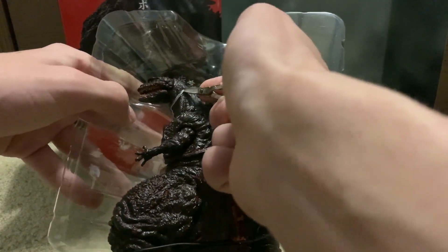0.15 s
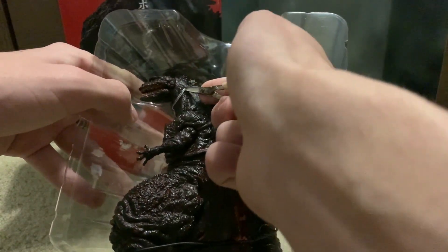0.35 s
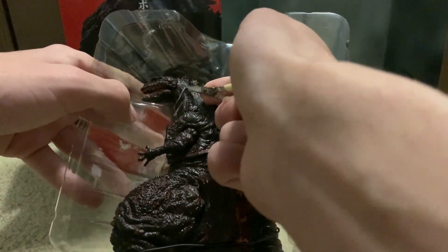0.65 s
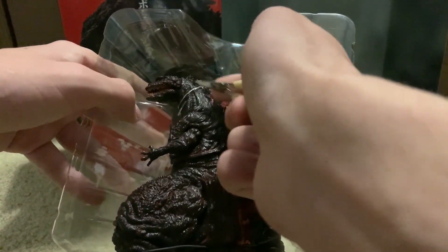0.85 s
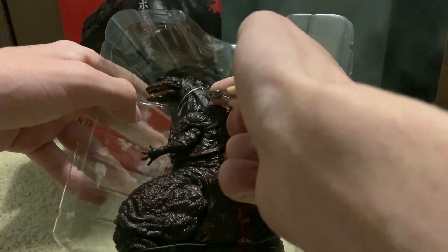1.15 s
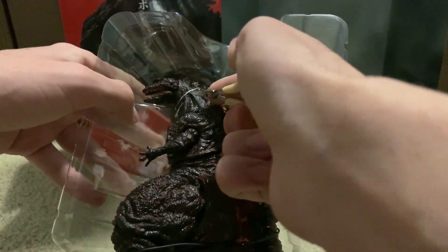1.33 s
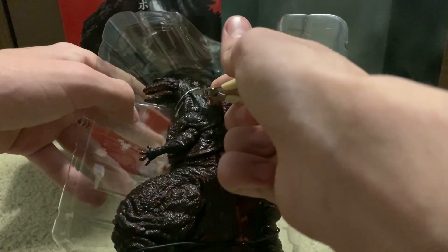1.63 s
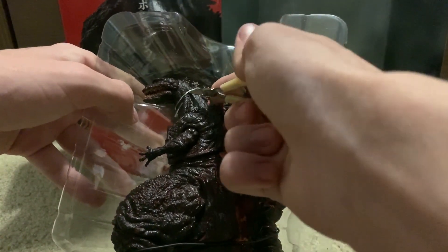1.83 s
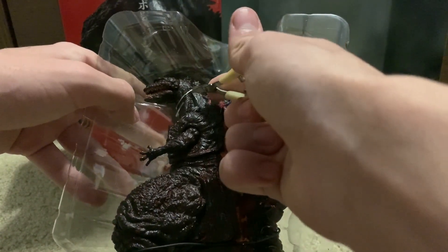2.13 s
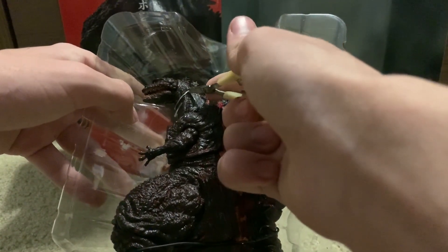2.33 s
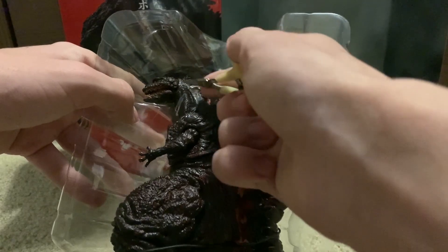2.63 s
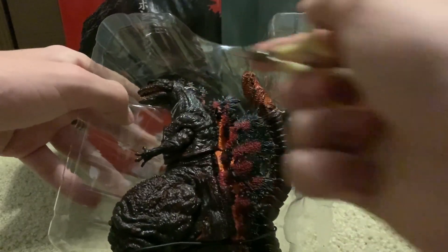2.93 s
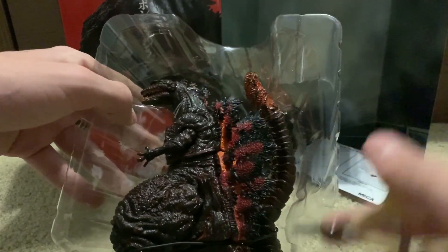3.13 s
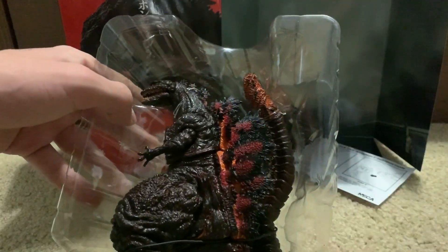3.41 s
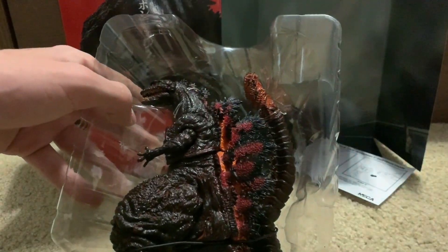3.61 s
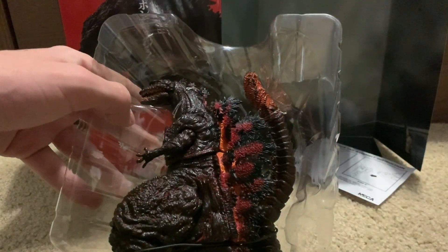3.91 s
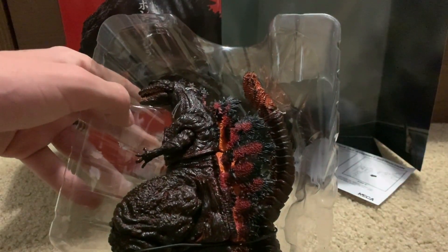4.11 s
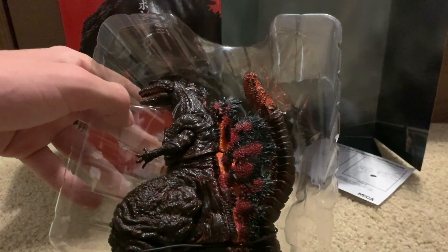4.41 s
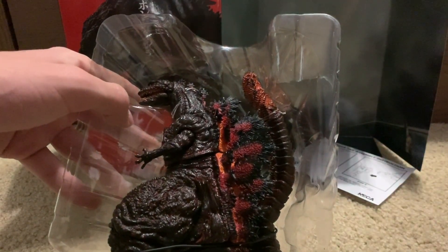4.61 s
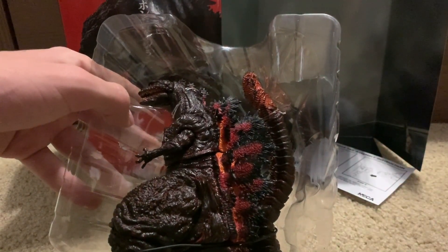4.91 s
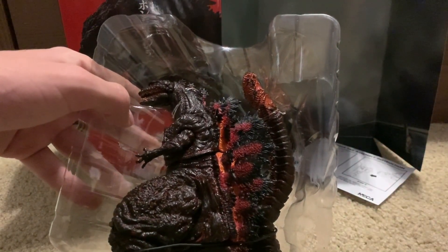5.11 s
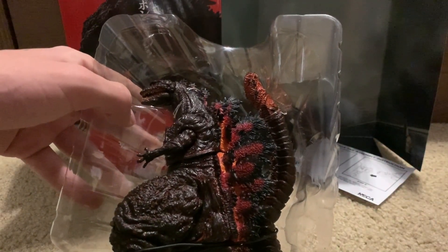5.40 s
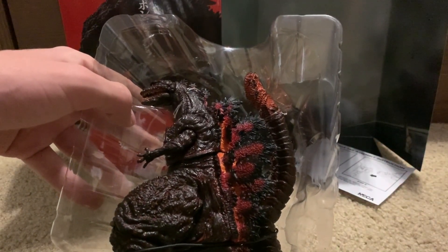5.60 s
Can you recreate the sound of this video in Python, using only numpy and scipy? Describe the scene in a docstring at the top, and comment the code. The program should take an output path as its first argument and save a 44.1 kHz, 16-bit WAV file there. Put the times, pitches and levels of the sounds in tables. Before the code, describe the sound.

Close to the microphone in a quiet room, small scissors snip the ties holding a toy figure in a thin plastic tray. Several short, sharp cracks come early, mixed with crisp plastic ticks, and the loudest snip falls near the middle. Soft knocks, rubs and rustles of handling follow, then one bright clink of the blades. Underneath, a faint low tone like a distant engine slowly rises, then sinks away.

```python
"""Close up, a hand shifts on a clear plastic tray holding a toy figure; the tray ticks and rustles over a
faint room hum. Small scissors snip its ties, each cut a short crack that rings the blades and jolts the
tray, with dull knocks, rubs and scrapes between. A low tone, perhaps a distant engine, slowly climbs.
After the last snip a hand swishes away; the tone fades and sinks, and the blades give one bright clink."""
import sys
import numpy as np
from scipy import signal
from scipy.fft import rfft, irfft, next_fast_len
from scipy.io import wavfile

SR = 44100
rng = np.random.default_rng(int(sys.argv[2]) if len(sys.argv) > 2 else 0)


def to_wav(s):
    """Save 16-bit WAV."""
    ch = np.atleast_2d(s).T  # columns
    pcm = np.round(np.clip(ch, -1, 1) * 32767)  # PCM
    wavfile.write(sys.argv[1], SR, pcm.astype(np.int16))


N = 253692

# the bands that shape every contact: (low edge [Hz], high edge [Hz])
BANDS = [(90, 350), (350, 900), (900, 2300), (2300, 5800), (7400, 11200), (10500, 16000)]
BAND_FILTERS = [signal.butter(N=3, Wn=band, btype="band", fs=SR, output="sos") for band in BANDS]
BAND_OCTAVES = np.log2(np.sqrt(np.prod(BANDS, 1)) / 1000)  # band centres, in octaves above 1 kHz
# modes of the thin tray with the figure in it, and of the steel blades: (pitch [Hz], level [dB], t60 [s])
TRAY_MODES = [(140, -13.5, 0.0077), (203, -14, 1), (271, -10.5, 0.099), (450.4, -9.5, 0.0037),
              (517, -5.5, 0.028), (664, 1.5, 0.027), (863, -6.5, .018), (1088, -7, 0.028),
              (1240, -6.5, 0.019), (1422, -1.5, 0.024), (2010, -6.5, 0.023), (2208, -6.5, 0.014),
              (2560, 0, .012), (3360, -6.5, 0.034), (3980, -2, 0.0051)]
BLADE_MODES = [(2330, -18.5, 0.12), (4640, -16.5, 0.11), (4230, -20, 0.18), (5170, -15, 0.018),
               (7800, -10, 0.012), (7780, -1.5, 0.0085), (11160, -4.5, 0.013), (13600, -5.5, 0.004),
               (12900, -3, 0.0082)]
# early echoes off the box, the arm and the floor: (delay [s], gain [factor])
ECHOES = [(.0023, -0.11), (.0042, 0.057), (.0069, 0.071), (0.0099, -.07), (0.0165, 0.046)]
# room tail, a row per band: (t60 [s], level against the direct sound [dB])
ROOM_TAIL = [(0.26, -1), (0.12, -9), (0.32, -16), (0.34, -13.5), (0.59, -23.5), (0.34, -21)]
# stereo width of that tail, per band: (side against mid [dB])
TAIL_WIDTH_DB = (-18.5, -14, -5, -14, -8, -8.5)
# appliance hum: (pitch [Hz], rms level [dB])
HUM = [(57, -74), (120, -75.5), (364, -91.5), (479, -82.5), (1800, -97.5), (13850, -95)]
# EQ of room air, handling, swish and microphone self-noise: (frequency [Hz], relative level [dB])
AIR_EQ = [(20, -22), (40, -7), (56, -2.5), (80, -5.5), (125, 0.5), (190, -5.5), (270, -18), (400, -23.5),
          (700, -45), (1500, -41), (6000, -55.5), (9000, -36), (14000, -42.5), (16000, -42.5)]
HANDLING_EQ = [(100, -21.5), (200, -0.5), (330, 2.5), (480, -1), (700, -16.5), (1300, -17), (2200, -21.5),
               (5000, -39), (12000, -49.5)]
SWISH_EQ = [(600, -31), (1500, -13), (2500, -2.5), (3800, -6), (5400, 1), (7000, -11), (15000, -17)]
SELF_NOISE_EQ = [(20, -14), (55, -3.5), (150, -1.5), (400, -11), (1500, -26.5), (5000, -28), (8000, -34.5),
                 (10000, -41.5), (14000, -36)]
# the strained tray and ties tick: (time [s], level [dB], extra treble [dB], pitch [Hz])
TICKS = [(-.03, -30.5, 8.5, 2420), (0.1173, -62, -25, 1500), (0.314, -48, -7, 1140),
         (0.4985, -46.5, 5.5, 2250), (0.5339, -50, 6, 725), (.5592, -45.5, -14, 1350),
         (0.6277, -40.5, -3.5, 2300), (.635, -54, 3, 2220), (0.6541, -50.5, 4, 1570),
         (0.6648, -48, -1, 1280), (0.6864, -34, 5.5, 2360), (0.747, -57.5, 11, 800.6),
         (1.0016, -66.5, -14, 1630), (1.6984, -50.5, -8.5, 1540), (1.7407, -66, 9, 4400),
         (1.8466, -63, -4, 2290), (1.941, -66.5, -9.5, 1310), (1.954, -56.5, -21, 1135),
         (2.044, -60, 6, 652), (2.627, -46, 8, 1730), (2.7695, -58.5, 0.5, 1200), (3.761, -75, -4.5, 1900),
         (3.942, -54, -5.5, 1510), (4.5332, -73.5, 5.5, 3250), (4.7544, -55.5, 0, 1220)]
# the holding hand tightens on the tray, then lets go: (time at the tightest [s], level [dB])
GRIPS = [(0, -62), (0.701, -58), (2.0, -61), (2.75, -56), (4.0, -69), (4.8, -70), (5.421, -64)]
# the blades bite a tie: (time [s], level [dB], brightness [dB/octave], crack decay [s], pitch [Hz])
SNIPS = [(0.29, -33.5, -2, 0.005, 698.5), (0.4361, -46.5, 2.54, .0014, 3100), (.45, -26, 2.32, .0012, 1545),
         (.4535, -34, 3.5, .0008, 11800), (.762, -23, -0.5, .0012, 620), (2.0559, -34, -0.8, 0.0014, 2044),
         (2.608, -20, -0.26, 0.0011, 544)]
# figure and fingers knock against the tray: (time [s], level [dB], brightness [dB/octave])
KNOCKS = [(0.602, -45.5, 0), (0.8578, -54, 0), (1.1401, -59.5, -1), (1.2066, -68, -3), (1.4137, -66, 1.5),
          (1.461, -62, 2), (1.5425, -57, -2), (2.1056, -48, 0.5), (2.5298, -52, 0), (2.556, -57, 3.5),
          (2.5631, -52.5, 0.5), (2.7084, -54.5, -3), (2.8517, -46, 2), (2.885, -50, 2.5),
          (2.9004, -47, -0.5), (3.8, -61.5, -2.5), (4.131, -56.5, 0), (4.774, -57, -1), (4.8042, -77, -7.5),
          (5.204, -62.5, 3)]
# soft rubs and scrapes, from fingers on the plastic and blades straining a tie before a snip:
# (peak time [s], half length [s], level [dB], centre [Hz])
RUBS_AND_SCRAPES = [(1.083, 0.047, -74.5, 1150), (1.99, 0.015, -66.5, 401.4), (2.048, 0.0032, -61.5, 1507),
                    (2.559, .022, -63, 898), (2.901, 0.014, -62.5, 914), (2.916, 0.013, -50, 262.6),
                    (3.803, .012, -54, 402), (4.17, 0.055, -71.5, 379.5), (4.758, 0.012, -62, 927),
                    (4.793, 0.019, -52, 296.5), (4.966, 0.11, -72.5, 398), (5.22, 0.044, -60.5, 415),
                    (5.212, .022, -74.5, 1207), (5.31, .014, -78, 1095), (5.449, 0.016, -75, 850),
                    (5.539, 0.012, -70.5, 860), (5.518, .07, -64, 308)]
# steel touches steel as the scissors open and shut: (time [s], level [dB])
CLINKS = [(1.6964, -59.5), (1.7409, -67.5), (4.127, -59), (4.4545, -72.5), (4.709, -53), (4.7144, -29.5),
          (5.0889, -57.5)]
# colour of each kind of contact, per band from low to high: (level [dB])
TICK_DB = (-5, -2, -2, -6.5, -20, -23.5)
SNIP_DB = (-11.5, -0.5, -0.5, -2, -3.5, -6)
KNOCK_DB = (2, 0, -12, -21.5, -35, -34)
CLINK_DB = (-25, -39, -36, -18, -3.5, 0.5)
# phase between the two microphone ports: (frequency [Hz], left's lead [rad])
PORT_PHASE = [(20, 0), (300, -.15), (700, -.25), (1500, -.55), (1900, -1.4), (3000, -2.1), (4500, -2.0),
              (5500, -4.2), (6400, -6.1), (8000, -4.4), (9600, -3.14), (11000, -2.0), (12300, -.3),
              (14000, .3), (15800, 2.5)]
# balance between them: (frequency [Hz], left minus right [dB])
PORT_BALANCE = [(20, .4), (150, .4), (300, -1.2), (700, -1.2), (1400, .7), (2300, .3), (4800, 3.3),
                (7000, 0), (15000, 0)]


def gain_of(db):
    """Decibels to a factor."""
    return 10 ** (np.asarray(db) / 20)


def unit_rms(x):
    """Scales to rms 1."""
    return x / np.sqrt(np.mean(x ** 2) + 1e-20)


def curve_at(points, hz):
    """Reads a (frequency [Hz], value) curve on a log-frequency axis."""
    f, value = np.transpose(points)
    return np.interp(np.log(hz + 1), np.log(f + 1), value)


def coloured(x, eq):
    """Puts x through an EQ curve, at rms 1."""
    return unit_rms(irfft(rfft(x) * gain_of(curve_at(eq, np.fft.rfftfreq(N, 1 / SR))), N))


def drift(rate_hz):
    """Slow random wander of rms 1."""
    hz = np.fft.rfftfreq(N, 1 / SR)
    hz = hz[hz < 150]
    real, imaginary = rng.standard_normal((2, len(hz)))
    return unit_rms(irfft((real + 1j * imaginary) * np.exp(-(hz / rate_hz) ** 2), N))


def swell(peak_s, rise_db_per_s, fall_db_per_s):
    """A fader move that climbs to 0 dB and falls away."""
    t = np.arange(N) / SR - peak_s
    return np.minimum(rise_db_per_s * t, -fall_db_per_s * t)


def add(mix, time_s, sound):
    """Mixes a sound in at a time."""
    part = mix[max(round(time_s * SR), 0):][:len(sound)]
    part += sound[:len(part)]


def in_bands(x):
    """Splits a sound into the BANDS, each with the energy of 10 ms at rms 1."""
    parts = np.array([signal.sosfilt(sos, x) for sos in BAND_FILTERS])
    return parts / np.sqrt((parts ** 2).sum(1, keepdims=True) / (SR // 100))


def focus(hz, depth_db):
    """A bell EQ across the bands, in dB: up around the struck part's pitch, down elsewhere."""
    nearness = np.exp(-(BAND_OCTAVES - np.log2(hz / 1000)) ** 2)
    return depth_db * (nearness - .5)


def ring(modes, t, detune):
    """Damped modes struck at t = 0; each blow lands elsewhere and shifts them a little."""
    hz, db, t60 = np.transpose(modes)[:, :, None]
    after = np.maximum(t, 0)
    fade = gain_of(db) * np.exp(-np.log(1000) * after / t60)
    return (fade * np.sin(2 * np.pi * hz * (1 + detune[:len(modes), None]) * after)).sum(0)


def click(levels_db, crack_s, part_hz, tray_db, blades_db, part_db, part_t60, rattle_db):
    """A gritty crack, as of tiny fractures; blades and struck part ring at once, the tray just after."""
    rattle_s, jolt_s = 0.006, 0.00058
    t = np.arange(SR // 10) / SR
    grit, detune = rng.standard_normal((2, len(t)))
    crack = grit * (np.exp(-t / crack_s) + gain_of(rattle_db) * np.exp(-t / rattle_s))
    # steel holds its pitch better than the flexing tray
    blades = gain_of(blades_db) * ring(BLADE_MODES, t, 0.013 * detune[::-1])
    tray = gain_of(tray_db) * ring(TRAY_MODES, t - jolt_s, 0.046 * detune)
    part = gain_of(part_db - 60 * t / part_t60) * np.sin(2 * np.pi * part_hz * t)
    return gain_of(levels_db) @ in_bands(crack + blades + tray + part)


def tick(db, crisp_db, hz):
    """A patch of thin plastic flips and rings briefly: crisp when bare, dull under a finger."""
    treble = BAND_OCTAVES > 1
    levels_db = np.array(TICK_DB) + db + crisp_db * treble + focus(hz, depth_db=4.5)
    return levels_db, click(levels_db, crack_s=0.0006, part_hz=hz, tray_db=-15, blades_db=-22,
                            part_db=-3, part_t60=0.0083, rattle_db=-23)


def room_tail(levels_db, build_s=0.00088, gate_s=0.11):
    """A diffuse room wash follows each click, as mid and side; a gate-like fade cuts it short."""
    t = np.arange(SR // 5) / SR
    t60, wet_db = np.transpose(ROOM_TAIL)[:, :, None]
    fade = np.exp(-np.log(1000) * t / t60 - (t / gate_s) ** 2) * (1 - np.exp(-t / build_s))
    fade *= gain_of(wet_db) / np.sqrt((fade ** 2).mean(1, keepdims=True))
    wash = in_bands(rng.standard_normal(len(t)))
    mid = gain_of(levels_db) @ (fade * wash)
    side = gain_of(levels_db + np.array(TAIL_WIDTH_DB)) @ (fade * wash[:, ::-1])
    return mid, side


def room_tone(air_db=-65, waver_db=2.5, wander_rad=0.39):
    """The bed: low rumble and faint hiss of still air, with a wavering appliance hum."""
    t = np.arange(N) / SR
    bed = gain_of(air_db) * coloured(rng.standard_normal(N), AIR_EQ)
    for hz, db in HUM:
        level = gain_of(db + waver_db * drift(11))
        bed += level * unit_rms(np.sin(2 * np.pi * hz * t + wander_rad * drift(12)))
    return bed


def friction(length, slips_per_s, hiss_db):
    """Stick and slip on plastic: tiny random pushes over a soft hiss."""
    slips = rng.standard_normal(length) * (rng.random(length) < slips_per_s / SR)
    return unit_rms(slips) + gain_of(hiss_db) * rng.standard_normal(length)


def handling(trim_db=1, resting_db=-92, clump_db=4.5):
    """Clumps of friction from the holding hand rustle the tray; the strongest grip rides the level."""
    drive = friction(N, slips_per_s=260, hiss_db=-14) * gain_of(clump_db * drift(30))
    tray = ring(TRAY_MODES, np.arange(SR // 12) / SR, np.zeros(len(TRAY_MODES)))
    body = signal.fftconvolve(drive, tray)[:N]
    rustle = coloured(unit_rms(body) + 2.9 * unit_rms(drive), HANDLING_EQ)
    grips_db = [db + swell(time_s, rise_db_per_s=62.5, fall_db_per_s=123.5) for time_s, db in GRIPS]
    return rustle * gain_of(trim_db + np.maximum(resting_db, np.max(grips_db, 0)))


def engine(nearest_db=-54, far_db=-74, waver_db=2.7, octave_db=-26, fade_in_s=0.25):
    """A far engine through the walls: it speeds up, then drops to idle, swelling as it passes."""
    start_hz, climb_octaves_per_s = 97.6, 0.2
    ease_off_s, sag_hz_per_s, idle_hz = 3.92, 39, 121.6
    t = np.arange(N) / SR
    climb_hz = start_hz * 2 ** (climb_octaves_per_s * np.minimum(t, ease_off_s))
    sag_hz = sag_hz_per_s * np.maximum(t - ease_off_s, 0)
    hz = np.maximum(climb_hz - sag_hz, np.minimum(climb_hz, idle_hz))
    phase = 2 * np.pi * np.cumsum(hz) / SR
    tone = unit_rms(np.sin(phase) + gain_of(octave_db) * np.sin(2 * phase))
    pass_db = np.maximum(nearest_db + swell(peak_s=3.24, rise_db_per_s=4.5, fall_db_per_s=12), far_db)
    fade_in = np.minimum(t / fade_in_s, 1) ** 2
    return fade_in * gain_of(pass_db + waver_db * drift(7.5)) * tone


def snip(db, brightness, crack_s, hz):
    """A tie gives way between the blades and jolts the tray."""
    levels_db = np.array(SNIP_DB) + db + brightness * BAND_OCTAVES + focus(hz, depth_db=1.5)
    return levels_db, click(levels_db, crack_s, part_hz=hz, tray_db=-11.5, blades_db=-17,
                            part_db=-3, part_t60=0.0053, rattle_db=-29)


def knock(db, brightness):
    """The figure or a finger lands a dull bump that the tray takes up."""
    levels_db = np.array(KNOCK_DB) + db + brightness * BAND_OCTAVES
    return levels_db, click(levels_db, crack_s=0.001, part_hz=475, tray_db=-9, blades_db=-31.5,
                            part_db=-7, part_t60=0.024, rattle_db=-19.5)


def rubs_and_scrapes(width_octaves=0.25):
    """Fingers rub the plastic or blades strain a tie: each a run of small slips that swells and fades."""
    t = np.arange(SR // 2) / SR
    hz = np.fft.rfftfreq(len(t), 1 / SR) + 1
    mix = np.zeros(N)
    for peak_s, half_s, db, centre_hz in RUBS_AND_SCRAPES:
        drive = friction(len(t), slips_per_s=220, hiss_db=-8)
        bell_eq = 1 / (1 + (np.log2(hz / centre_hz) / width_octaves) ** 2 / 2) ** 2
        stroke = unit_rms(irfft(rfft(drive) * bell_eq, len(t)))
        envelope = np.exp(-((t - t.mean()) / half_s) ** 2 / 2)
        add(mix, peak_s - t.mean(), gain_of(db) * stroke * envelope)
    return mix


def clink(db):
    """The blades meet with nothing between them and ring freely."""
    levels_db = np.array(CLINK_DB) + db
    return levels_db, click(levels_db, crack_s=0.0003, part_hz=12070, tray_db=-23.5, blades_db=-16.5,
                            part_db=-15, part_t60=0.007, rattle_db=-16.5)


def swish(peak_s=3.0, half_s=0.06, db=-72):
    """The hand with the scissors brushes past as it draws away."""
    envelope = np.exp(-((np.arange(N) / SR - peak_s) / half_s) ** 2 / 2)
    return gain_of(db) * coloured(rng.standard_normal(N), SWISH_EQ) * envelope


def contacts(preroll=SR // 10):
    """Every click with its echoes and tail, as mid and side; the pre-roll lets an early tick ring in."""
    mid, side = np.zeros((2, preroll + N))
    for strike, cues in [(snip, SNIPS), (tick, TICKS), (knock, KNOCKS), (clink, CLINKS)]:
        for time_s, *settings in cues:
            start_s = time_s + preroll / SR
            levels_db, hit = strike(*settings)
            for delay_s, gain in [(0.00018, 0.97)] + ECHOES:  # the direct path, then the echoes
                add(mid, start_s + delay_s, gain * hit)
            for mix, wash in zip((mid, side), room_tail(levels_db)):
                add(mix, start_s, wash)
    return mid[preroll:], side[preroll:]


def microphone_ports(x):
    """Two ports hear the same sound with a phase and level difference."""
    size = next_fast_len(N + SR // 10)
    hz = np.fft.rfftfreq(size, 1 / SR)
    left = np.exp(1j * curve_at(PORT_PHASE, hz) / 2) * gain_of(curve_at(PORT_BALANCE, hz) / 2)
    return irfft(rfft(x, size) * np.array([left, 1 / left]), size)[:, :N]


def scene(self_noise_db=-74):
    """The stereo mix: all sources at the ports, the tail's width, each microphone's rumble and hiss."""
    mid, side = contacts()
    self_noise = np.array([coloured(rng.standard_normal(N), SELF_NOISE_EQ) for _ in range(2)])
    stereo = microphone_ports(mid + handling() + rubs_and_scrapes() + swish() + engine() + room_tone())
    return stereo + np.array([side, -side]) + gain_of(self_noise_db) * self_noise


def record(dry):
    """A steep low-pass trims the very top."""
    lowpass = signal.firwin(255, cutoff=16200, window=("kaiser", 9), fs=SR)
    return signal.oaconvolve(dry, lowpass[None], "same")


dry = scene()
out = record(dry)
to_wav(out)
```